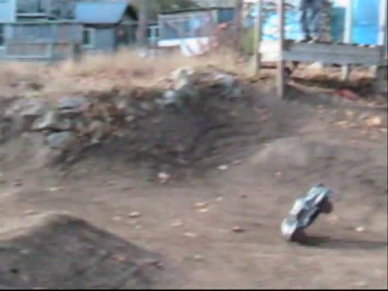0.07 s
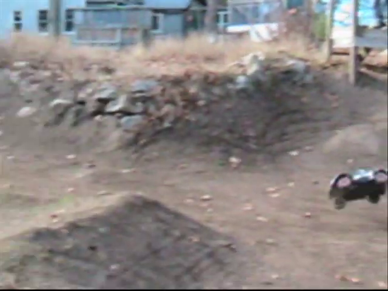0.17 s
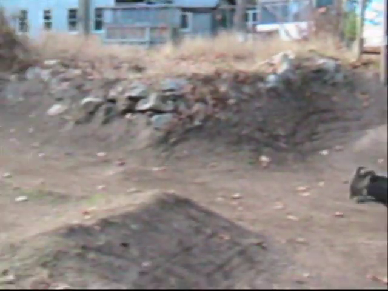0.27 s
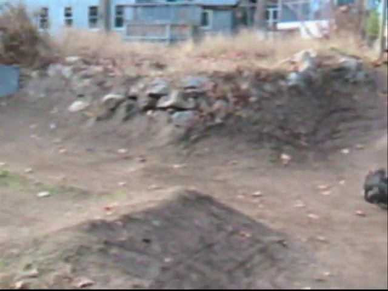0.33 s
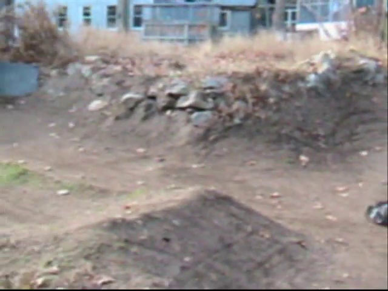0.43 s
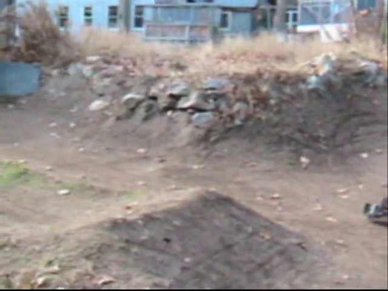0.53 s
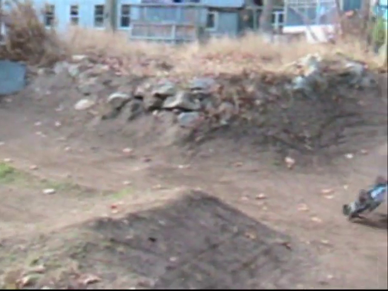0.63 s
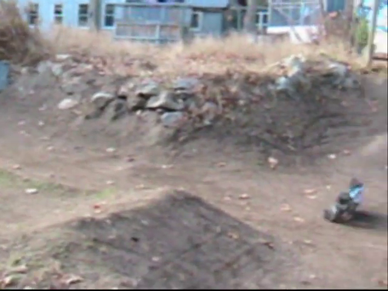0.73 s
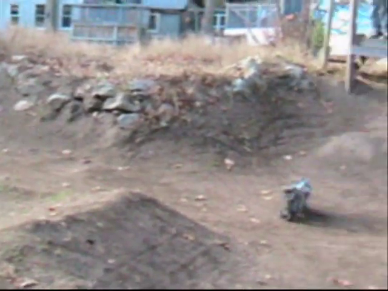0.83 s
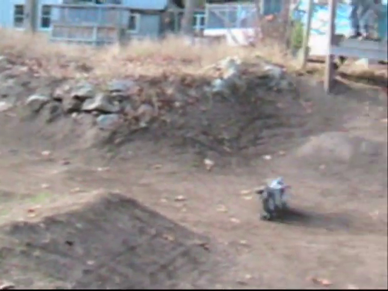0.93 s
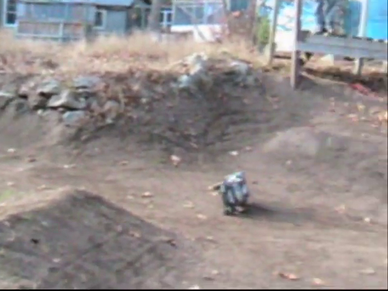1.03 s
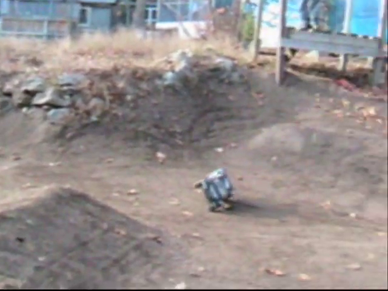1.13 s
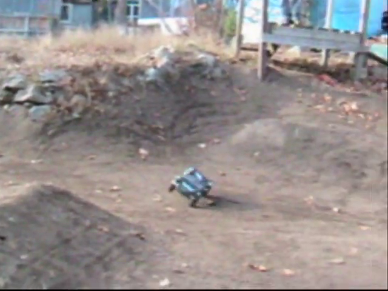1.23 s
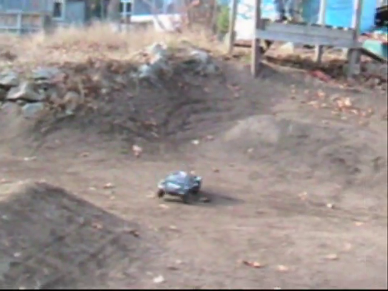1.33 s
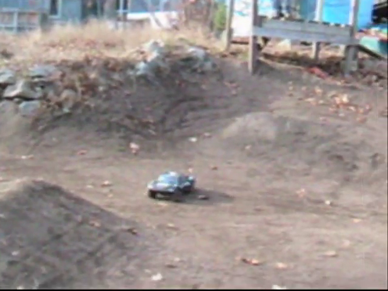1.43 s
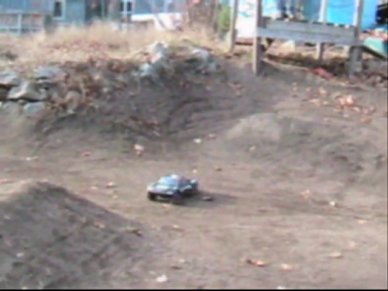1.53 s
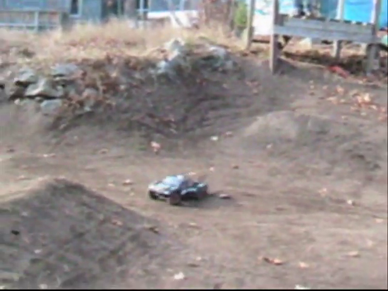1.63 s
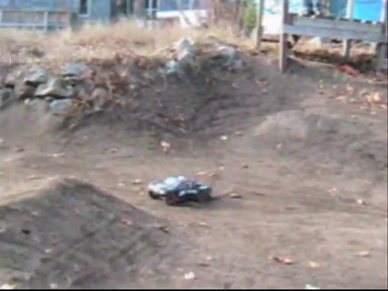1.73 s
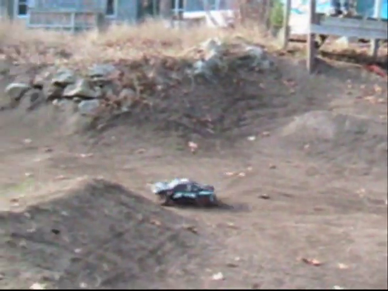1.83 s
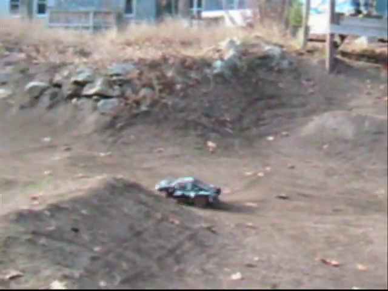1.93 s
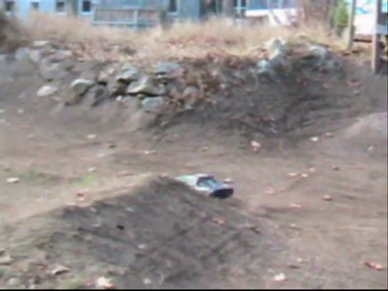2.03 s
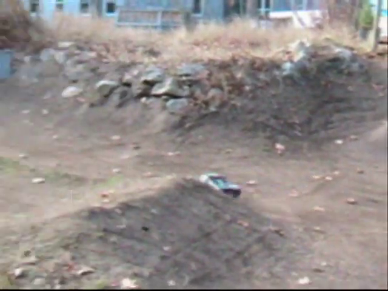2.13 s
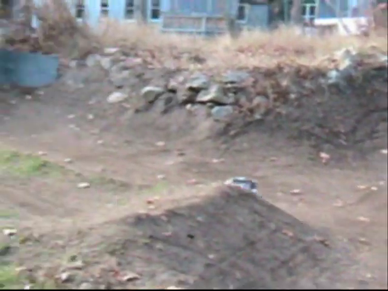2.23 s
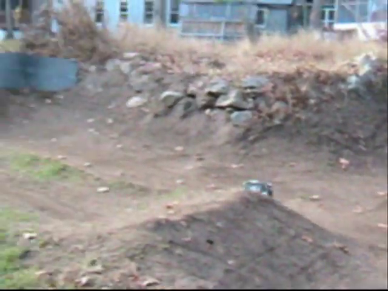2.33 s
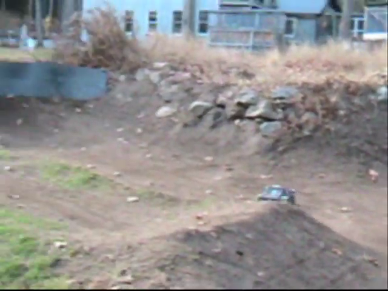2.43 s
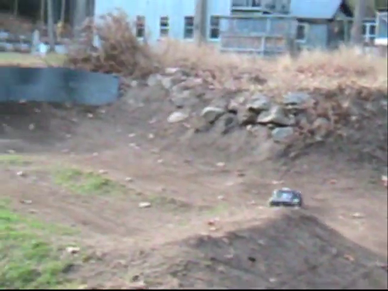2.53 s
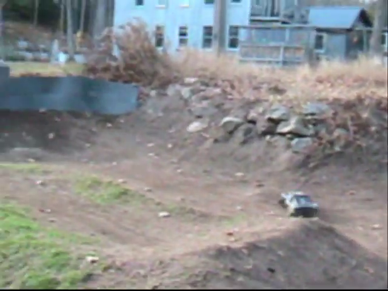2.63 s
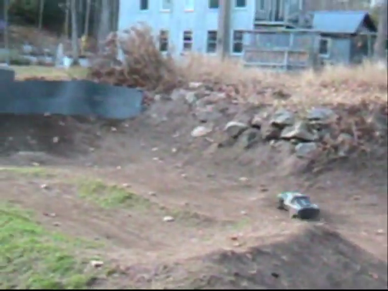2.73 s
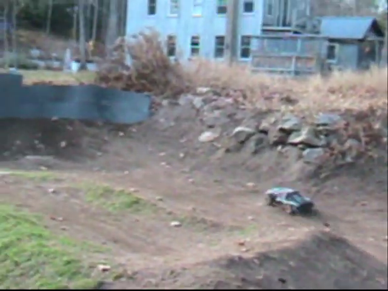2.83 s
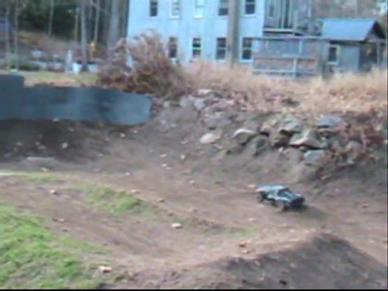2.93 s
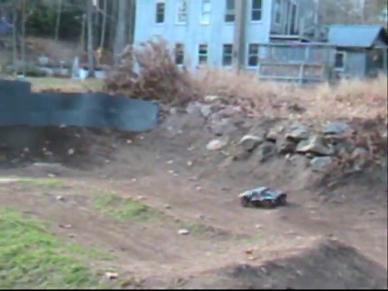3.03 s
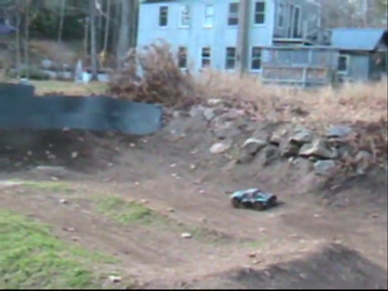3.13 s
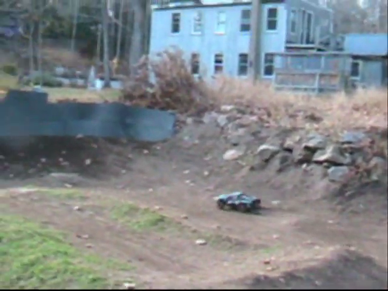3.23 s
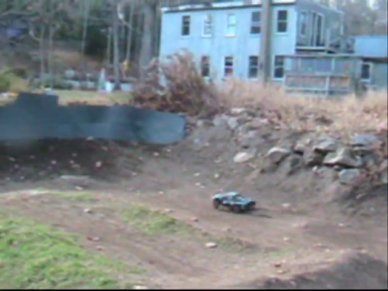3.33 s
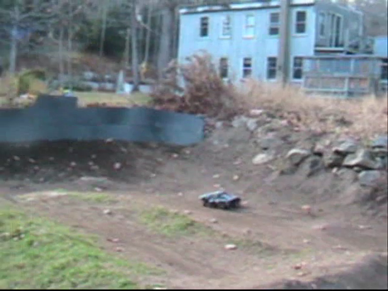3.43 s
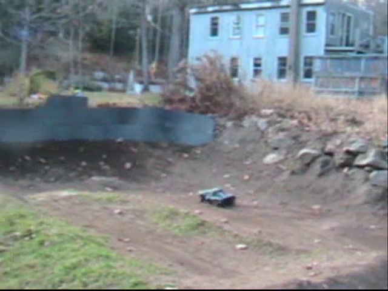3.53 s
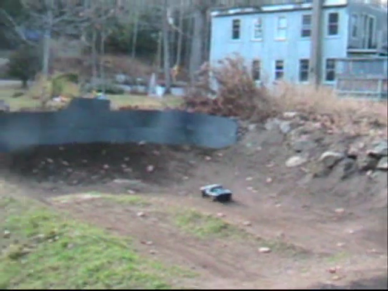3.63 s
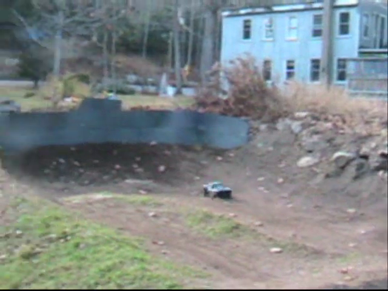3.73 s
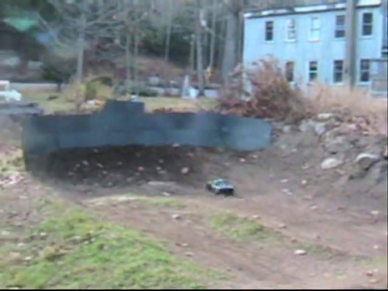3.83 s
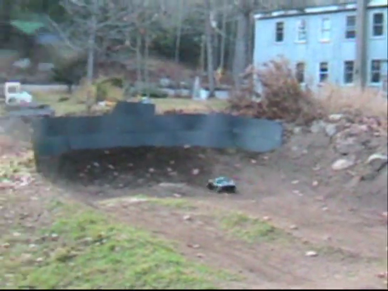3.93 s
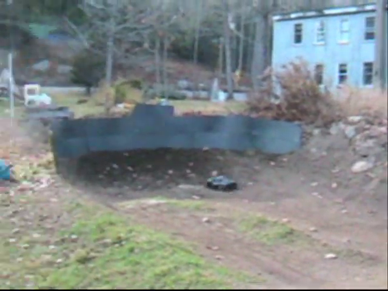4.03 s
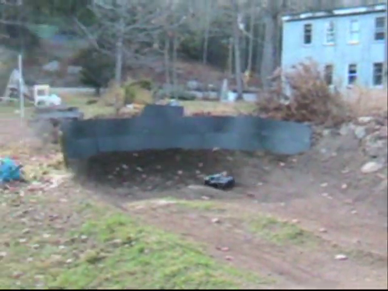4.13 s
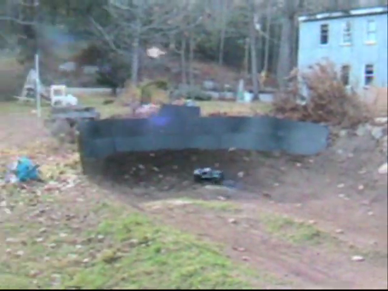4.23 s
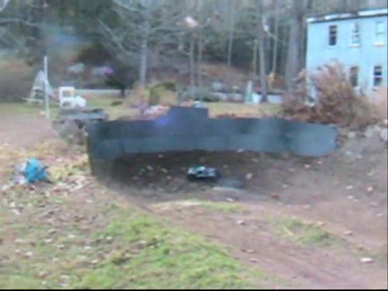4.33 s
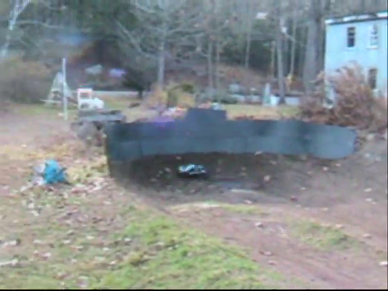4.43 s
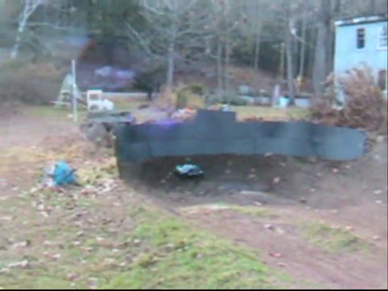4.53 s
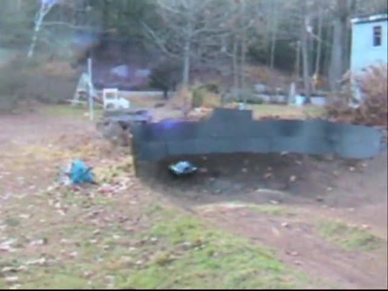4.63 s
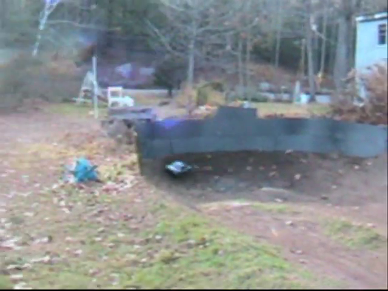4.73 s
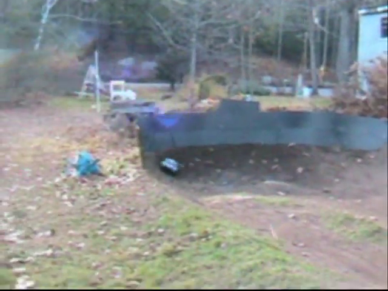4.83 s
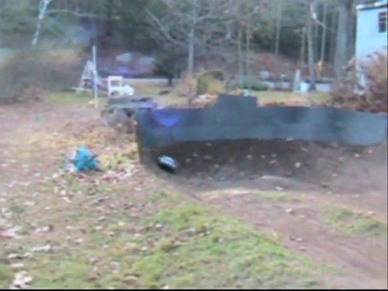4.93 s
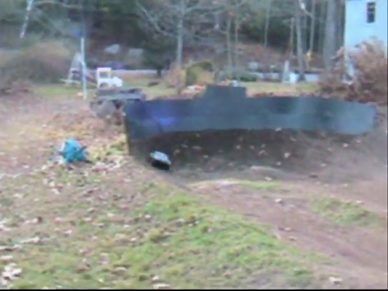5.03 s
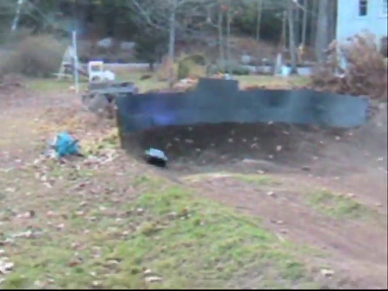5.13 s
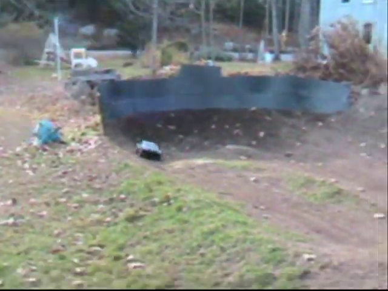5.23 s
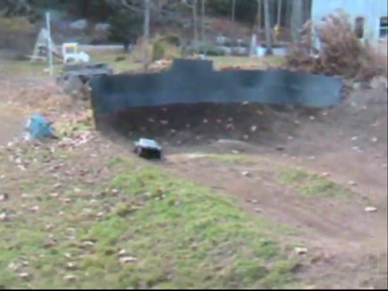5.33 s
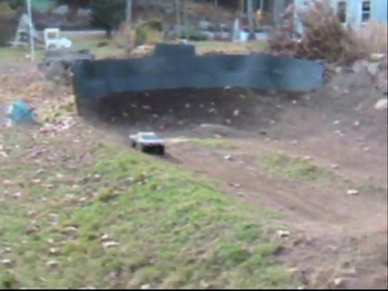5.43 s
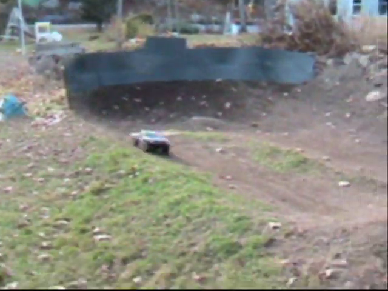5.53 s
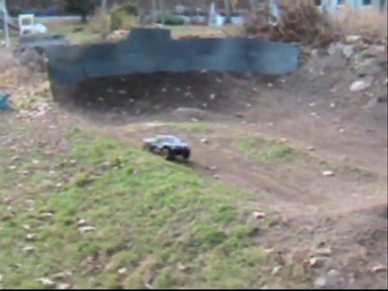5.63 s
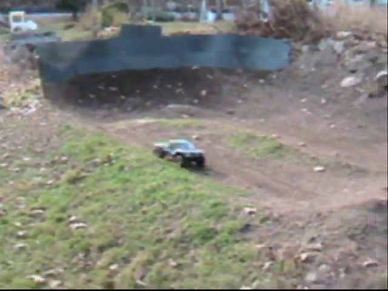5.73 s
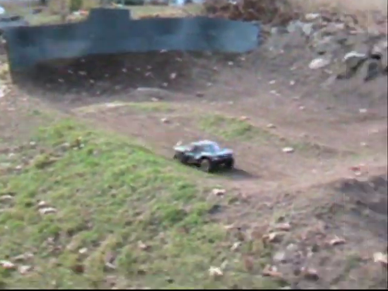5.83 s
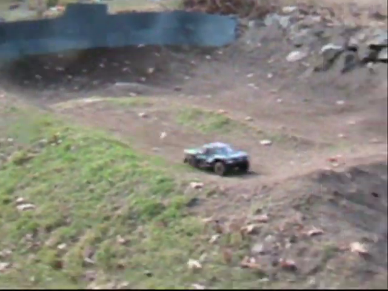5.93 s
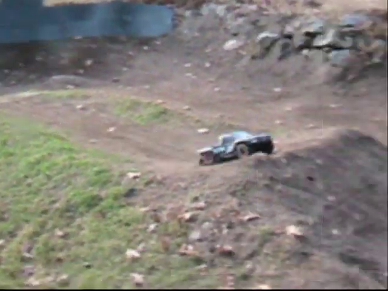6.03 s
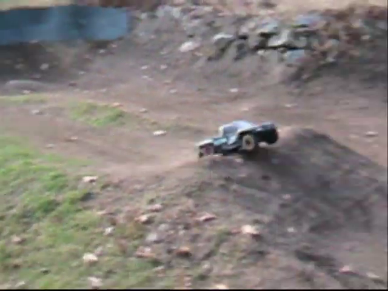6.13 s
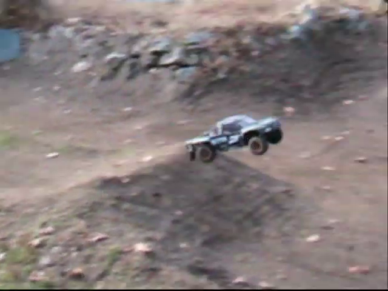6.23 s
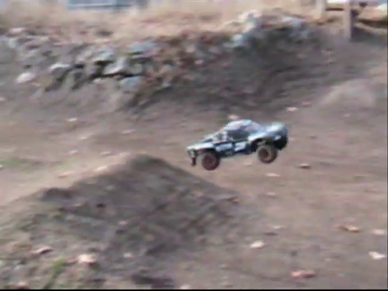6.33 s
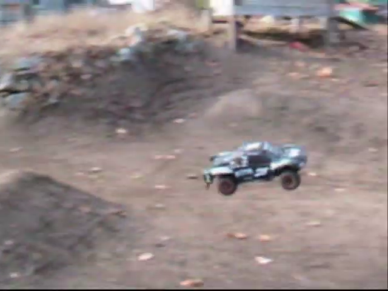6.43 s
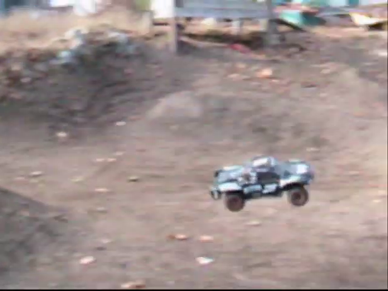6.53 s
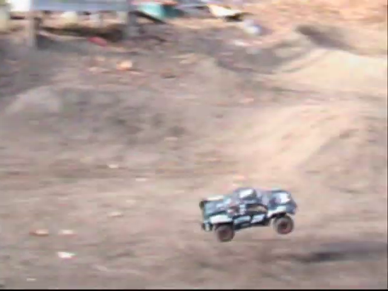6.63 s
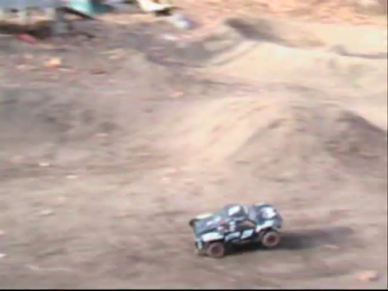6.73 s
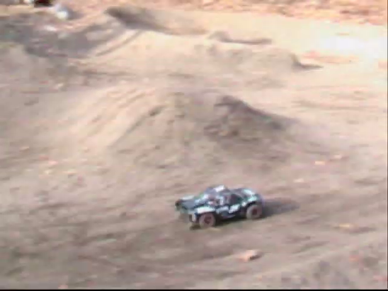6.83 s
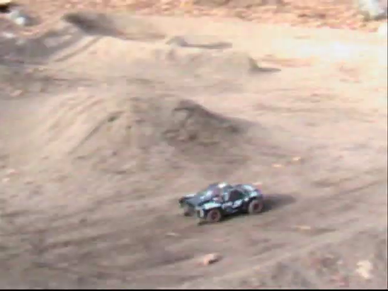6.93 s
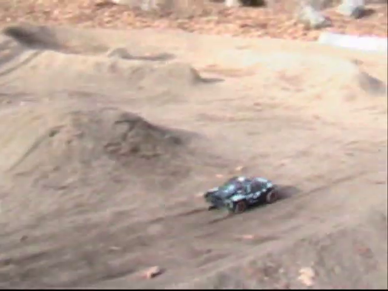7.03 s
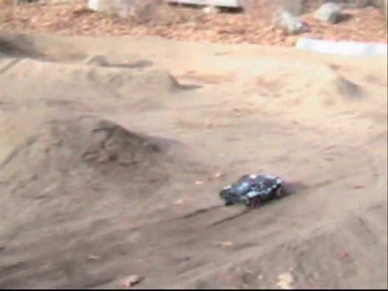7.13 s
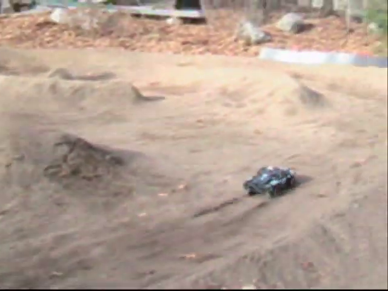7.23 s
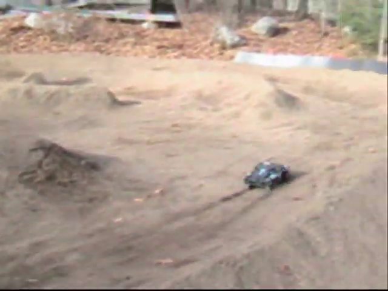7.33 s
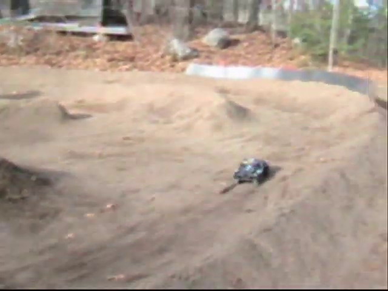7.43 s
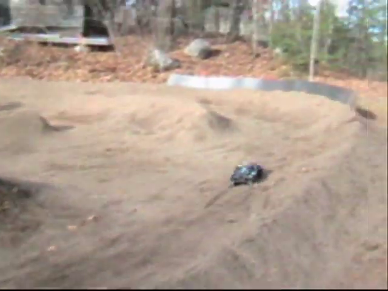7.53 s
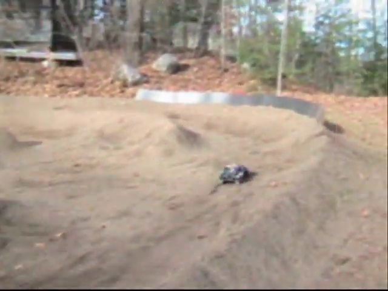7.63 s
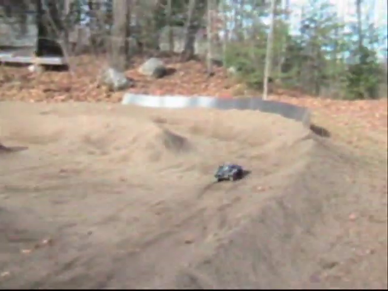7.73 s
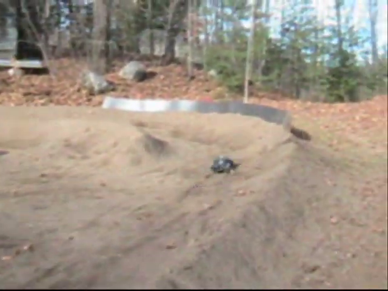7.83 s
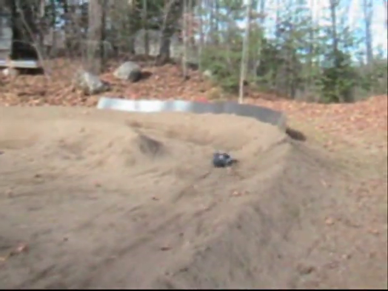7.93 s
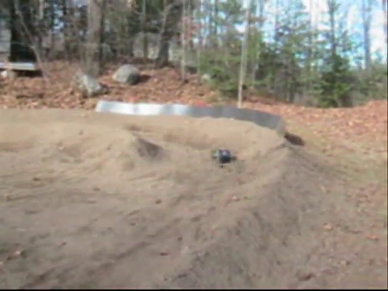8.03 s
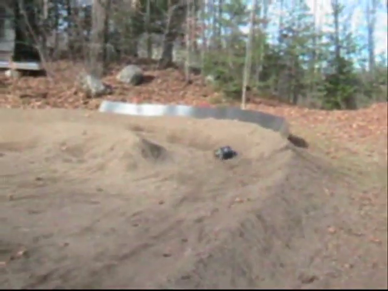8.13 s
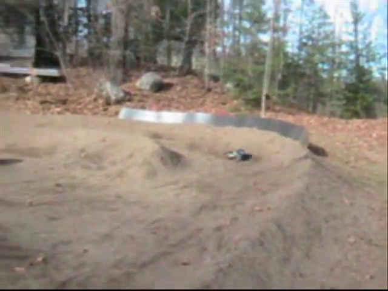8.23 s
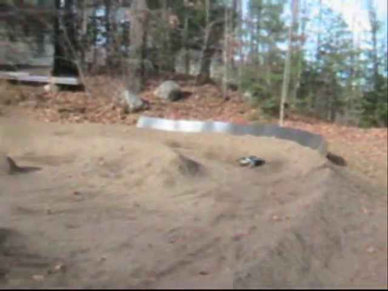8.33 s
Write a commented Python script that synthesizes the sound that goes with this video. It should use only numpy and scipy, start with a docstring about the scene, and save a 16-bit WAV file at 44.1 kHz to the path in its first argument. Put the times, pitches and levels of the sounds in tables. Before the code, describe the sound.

Outdoors, over faint steady air, a quick run of loud hollow plastic knocks marks a radio-controlled truck crashing on dirt. Its electric motor then spins up and whines in swoops and chirps, quieter than the crash, along with gritty tyre noise and chattering gears. Sharp clacks bunch together over bumps before a short, clattering landing near the microphone, after which the whine picks up again.

```python
"""A plastic shell claps, booms and rattles over faint outdoor air: a small electric radio-controlled truck
tumbles after a jump. It rights itself and laps a dirt track. The tyres drum, scrub and throw grit, the
motor whines in swoops as the wheels hop and grip, and the drivetrain chatters and clacks over the bumps.
A chirr pulses through the banked turn; the truck lands a second jump close by and drives on."""
import sys
import numpy as np
from scipy import signal
from scipy.fft import rfft, irfft, next_fast_len
from scipy.io import wavfile
from scipy.ndimage import map_coordinates

SR = 44100
rng = np.random.default_rng(int(sys.argv[2]) if len(sys.argv) > 2 else 0)


def dump(signal):
    """Clip the signal to [-1, 1] and save it as 16-bit WAV at the path in sys.argv[1]."""
    limited = np.clip(np.atleast_2d(signal).T, -1, 1)
    pcm = np.round(limited * 32767).astype(np.int16)
    wavfile.write(sys.argv[1], SR, pcm)


N = 369116
TIME = np.arange(N) / SR

# the bed of outdoor air: (frequency [Hz], relative level [dB])
AIR_EQ = [(20, -18), (45, -28), (75, -14), (130, -10.5), (210, -6), (300, -3), (400, -6.5), (570, -8.5),
          (920, -15), (2170, -22.5), (7700, -44), (15500, -37)]
# partials of a faint low hum: (frequency [Hz], relative level [dB])
HUM_PARTIALS = [(43, -62.5), (102, -58.5), (204, -52)]
# the shell hits the ground: (time [s], boom [dB], thump [dB], clap [dB])
SHELL_HITS = [(0.096, 7, -10.5, -11.5), (0.134, -10, -17.5, -19.5), (0.183, -11, -36, -27.5),
              (0.218, -13, -30, -36), (0.344, -22, -40, -38), (0.402, -1, -15, -18.5),
              (0.452, -6, -13, -21), (0.522, -4.5, -14, -14), (0.763, -22, -34.5, -33.5),
              (0.841, -12, -18, -22), (0.884, -14.5, -38, -31.5), (1.016, -16.5, -26, -30),
              (1.433, -32, -32, -34), (6.82, -10.5, -24, -18.5), (6.835, -6.5, -10, -11),
              (6.879, -2.5, -16, -19.5)]
# resonances of the shell: (frequency [Hz], level [dB], t60 [s])
SHELL_MODES = [(221, -7, 0.12), (270, -5, 0.1), (515, -1.5, 0.062), (570, -5, 0.045), (712, -6.5, 0.06),
               (908, -17.5, 0.055), (1800, -10.5, 0.015)]
# the body and the snap of a hit: (frequency [Hz], relative level [dB])
THUMP_EQ = [(20, -75), (40, -35), (100, -11.5), (200, 0), (270, -2.5), (370, -2), (520, 2.5), (700, 0.5),
            (1000, -11.5), (2000, -39)]
CLAP_EQ = [(300, -20), (800, 1), (1400, 2), (2500, -5), (4000, -11.5), (5500, -19), (6500, -27.5),
           (8500, -27), (12000, -20), (15500, -16)]
# a hard chassis part strikes the ground: (time [s], level [dB])
CHASSIS_HITS = [(0.843, -18)]
# resonances of that part: (frequency [Hz], level [dB], t60 [s])
CHASSIS_MODES = [(2870, 5, 0.019), (3300, -16, 0.022)]
# tyre faders through bends, banked turn and jump: (time [s], scrub [dB], rumble [dB], grit [dB])
TYRE_LEVELS = [(1.439, -41, -33.5, -45.5), (1.56, -37.5, -47, -39), (1.95, -33.5, -38.5, -42),
               (2.47, -39, -46.5, -46.5), (2.55, -53, -65, -58.5), (2.68, -49, -67, -59),
               (2.86, -40, -58.5, -44.5), (3.049, -37.5, -47, -44), (3.22, -42.5, -59, -48.5),
               (3.37, -38.5, -42.5, -42), (3.699, -44, -45, -50), (4.08, -41, -41, -48),
               (4.33, -30.5, -34.5, -43), (4.661, -35.5, -38.5, -42), (5.1, -46, -47, -50.5),
               (5.7, -39.5, -42, -44), (6.0, -33, -37.5, -38.5), (6.24, -33, -35.5, -37.5),
               (6.36, -43.5, -47, -45.5), (6.759, -43, -47, -46.5), (7.05, -33.5, -41.5, -39.5),
               (7.9, -40.5, -49.5, -47), (8.36, -39, -45, -47.5)]
# tone of the three tyre layers: (frequency [Hz], relative level [dB])
RUMBLE_EQ = [(40, -46.5), (100, -6), (180, -2), (270, 3), (390, -5), (550, 0), (800, -24.5), (1500, -47.5)]
SCRUB_EQ = [(350, -20), (620, 6.5), (850, 3), (1150, 2.5), (1600, 0), (2200, -22), (4000, -35)]
GRIT_EQ = [(900, -18), (1800, 2), (2500, -1.5), (3500, -4.5), (4800, -9), (6300, -18.5), (8000, -22.5),
           (10500, -15), (13800, -13), (14700, -11.5), (15500, -16)]
# pulls of the throttle:
# (on [s], off [s], start pitch [Hz], target pitch [Hz], whine [dB], drone [dB], chatter [dB])
THROTTLE_PULLS = [(1.448, 2.12, 1310, 4150, -48, -47, -43), (2.171, 2.42, 4700, 4350, -58.5, -43, -43),
                  (2.75, 3.1, 2095, 3990, -50.5, -44.5, -41), (3.25, 3.52, 2680, 4150, -49, -42.5, -39.5),
                  (3.62, 4.027, 3090, 4560, -53, -58, -40.5), (4.15, 4.906, 4460, 4145, -55, -58, -40.5),
                  (4.96, 5.12, 3720, 3300, -56, -69, -42), (5.17, 5.85, 4100, 4705, -55.5, -49.5, -41.5),
                  (5.95, 6.28, 4720, 4795, -61, -46, -39.5), (6.97, 7.298, 3400, 4500, -45.5, -40, -41),
                  (7.353, 8.03, 4425, 4480, -51, -43, -37.5), (8.12, 8.37, 4100, 4550, -53.5, -58, -49)]
# motor chirps: a rising zip as the truck launches, then chirps on the hardest tyre bites: (time [s], first
# pitch [Hz], last pitch [Hz], level [dB])
BITE_CHIRPS = [(1.468, 1106, 1655, -27), (1.524, 2500, 2955, -39), (1.644, 3760, 3515, -37.5),
               (1.802, 4170, 3500, -40.5), (1.872, 4150, 3888, -39), (2.845, 3070, 2940, -42),
               (2.91, 3630, 3084, -40), (3.035, 4000, 3460, -45), (3.274, 3000, 2810, -41),
               (3.406, 3920, 3286, -41), (3.645, 3280, 2975, -36.5), (3.945, 4140, 3800, -43.5),
               (4.474, 4050, 3870, -45), (4.801, 4880, 4200, -54), (5.185, 4800, 3800, -51.5),
               (5.44, 4900, 4100, -50), (6.189, 4850, 4450, -43), (7.02, 4200, 3590, -41),
               (7.645, 4710, 4400, -43)]
# resonances of the drivetrain: (frequency [Hz], level [dB], t60 [s])
GEARBOX_MODES = [(1271, 1, 0.018), (1381, -3, 0.066), (1476, -3.5, 0.022)]
# suspension and drivetrain clack over bumps: (time [s], ring [dB], tick [dB])
BUMP_CLACKS = [(3.2385, -30, -59), (4.0838, -29.5, -53), (4.1938, -45, -31.5), (4.3121, -29, -33),
               (4.3405, -27, -36), (4.7738, -24.5, -52), (6.1281, -18.5, -23.5), (6.1908, -21.5, -32),
               (6.2426, -26, -26), (6.335, -21.5, -36), (6.3916, -24.5, -37), (6.4867, -24, -39),
               (6.552, -28, -56), (6.7062, -30, -38), (7.4367, -17, -40)]

REBOUND_S, REBOUND_LOSS_DB = .026, (7, 5, 7.5)   # typical gap; loss per bounce in boom, thump, clap
SPIN_UP_S, STRAIN_DB_PER_OCTAVE, CHATTER_DB_PER_OCTAVE, COAST_DB = .17, 10, 8, -2.5
MIRROR_HZ, LOWER_MIRROR_HZ = 16000, 12000   # carriers that flip the gear sound into the treble


def from_db(db):
    """Decibels to gain."""
    return 10 ** (np.asarray(db) / 20)


def rms_one(x):
    """Scale to unit power."""
    return x / np.sqrt(np.mean(x ** 2) + 1e-20)


def automation(rows):
    """Breakpoints (time, values...) drawn out into one curve per value."""
    times, *columns = np.transpose(rows)
    return [np.interp(TIME, times, column) for column in columns]


def during(start, end, fade):
    """A gate, fully open from start to end, with soft edges."""
    return np.interp(TIME, [start - fade, start, end, end + fade], [0, 1, 1, 0])


def drift(per_s):
    """Smooth random modulation at unit power, through per_s points a second."""
    knots = rng.standard_normal(4000)
    return rms_one(map_coordinates(knots, [TIME * per_s], order=2, mode="wrap"))


def colour(x, eq):
    """Minimum-phase EQ, so attacks stay clean; white noise keeps its power."""
    size = 2 * next_fast_len(N // 2 + SR // 2)
    hz, db = np.transpose(eq)
    bin_hz = np.arange(size // 2 + 1) * SR / size
    gain = rms_one(from_db(np.interp(np.log(bin_hz + 1), np.log(hz), db)))
    cepstrum = irfft(np.log(gain))
    cepstrum[1:size // 2] *= 2
    cepstrum[size // 2 + 1:] = 0
    return irfft(rfft(x, size) * np.exp(rfft(cepstrum)))[:N]


def ring(force, modes):
    """A resonator bank: a unit click rings each mode at its own level, in alternating polarity."""
    out = np.zeros(N)
    for k, (hz, db, t60) in enumerate(modes):
        radius, angle = from_db(-60 / (t60 * SR)), 2 * np.pi * hz / SR
        feedback = [1, -2 * radius * np.cos(angle), radius * radius]
        out += (-1) ** k * from_db(db) * signal.lfilter([0, np.sin(angle)], feedback, force + 1e-18)
    return out


def clicks(times, db):
    """One click for each event."""
    out = np.zeros(N)
    out[np.round(times * SR).astype(int)] = from_db(db)
    return out


def dying(blows, t60):
    """Envelope that jumps at each blow and dies away; overlapping blows add in power."""
    power_kept = from_db(-120 / (t60 * SR))
    return np.sqrt(signal.lfilter([1], [1, -power_kept], blows ** 2 + 1e-18))


def grains(per_s, spread_db):
    """Tiny contacts of uneven size at random moments, at unit power."""
    sizes = from_db(spread_db * np.minimum(rng.exponential(1, N), 4))
    return rms_one(sizes * rng.choice([-1, 1], N) * (rng.random(N) < per_s / SR))


def background():
    """Steady outdoor air, with a faint wavering hum that fades in towards the end."""
    air = from_db(-43) * colour(rng.standard_normal(N), AIR_EQ)
    hum = sum(from_db(db + 4) * np.sin(2 * np.pi * hz * TIME + .5 * drift(7.1))
              for hz, db in HUM_PARTIALS)
    return air + hum * np.interp(TIME, [5.8, 8.1], [0, 1])


def rebounds(contacts):
    """The shell bounces unevenly after each hit, weaker every time; rows as in SHELL_HITS."""
    blows = []
    for time, *levels_db in SHELL_HITS:
        for k in range(contacts):
            blows.append((time, *(np.array(levels_db) - k * np.array(REBOUND_LOSS_DB))))
            time += REBOUND_S * rng.uniform(.7, 1.3)
    return blows


def crashes():
    """Each blow booms in the thin shell, which claps against the chassis and rattles on."""
    times, boom_db, thump_db, clap_db = np.transpose(rebounds(contacts=4))
    boom = ring(clicks(times, boom_db - 9), SHELL_MODES)
    # so small a shell gives off no deep bass
    boom = signal.sosfilt(signal.butter(2, 60, "high", fs=SR, output="sos"), boom)
    thump_envelope = dying(clicks(times, thump_db - .5), t60=.15)
    thump = colour(thump_envelope * grains(3000, spread_db=1.5), THUMP_EQ)
    slaps = clicks(times, clap_db + 1.5)
    clap = dying(slaps, t60=.0073)
    rattle = from_db(-.5 + 3.6 * drift(250)) * dying(slaps, t60=.11)
    falling_dirt = from_db(-29 + .96 * drift(140)) * dying(slaps, t60=1)
    # softened attack: the flexible panels take a moment to come fully into contact
    envelope = signal.sosfilt(signal.butter(1, 96.5, fs=SR, output="sos"), clap + rattle + falling_dirt)
    return boom + thump + colour(envelope * grains(7000, spread_db=4), CLAP_EQ)


def yard_echo(x, t60, dull_hz):
    """Banks, fence and trees scatter back a thin, dull tail."""
    echoes = grains(1500, spread_db=-1) * from_db(-60 * TIME / t60) * (TIME > .012)
    echoes = signal.sosfilt(signal.butter(1, dull_hz, fs=SR, output="sos"), echoes[:SR])
    return signal.fftconvolve(x, echoes / np.sqrt(np.sum(echoes ** 2)))[:N]


def chassis_knock():
    """A stiff part of the chassis strikes the ground with a short, bright clack."""
    return ring(clicks(*np.transpose(CHASSIS_HITS)), CHASSIS_MODES)


def tyres():
    """Knobs drum on the ground, scrub the soil and fling grit at the shell, surging with the bumps."""
    rolling = during(TYRE_LEVELS[0][0], TYRE_LEVELS[-1][0], fade=.038)
    scrub, rumble, grit = from_db(automation(TYRE_LEVELS)) * rolling
    bumps = np.tanh(drift(55))   # the suspension cushions the largest jolts
    drumming = colour(rumble * from_db(-1 + bumps) * grains(2500, spread_db=4), RUMBLE_EQ)
    scrubbing = colour(scrub * from_db(-.5 + 2.9 * bumps) * grains(3000, spread_db=1), SCRUB_EQ)
    spray = colour(grit * from_db(-.76 + 4.24 * bumps) * grains(6000, spread_db=3), GRIT_EQ)
    return drumming + scrubbing + spray


def throttle():
    """Each pull glides the motor towards a target speed; between pulls it coasts, the gears quieter."""
    course, pulling, whine_gain, drone_gain = [], 0, 0, 0
    for on, off, start_hz, target_hz, whine_db, drone_db, chatter_db in THROTTLE_PULLS:
        for time in np.linspace(on, off):
            hz = target_hz + (start_hz - target_hz) * np.exp((on - time) / SPIN_UP_S)
            course.append((time, hz, target_hz, chatter_db))
        held = during(on, off, fade=.014)
        pulling = np.maximum(pulling, held)
        whine_gain += held * from_db(whine_db)
        drone_gain += held * from_db(drone_db)
    speed_hz, target_hz, chatter_db = automation(sorted(course))
    # below its target the motor strains: more whine, less drone
    strain = from_db(STRAIN_DB_PER_OCTAVE * np.log2(target_hz / speed_hz))
    chatter_db += CHATTER_DB_PER_OCTAVE * np.log2(speed_hz / speed_hz.max()) + COAST_DB * (1 - pulling)
    chatter_gain = from_db(chatter_db) * (TIME > THROTTLE_PULLS[0][0])
    return speed_hz, whine_gain * strain, drone_gain / strain, chatter_gain


def wheel_hop(per_s, unevenness):
    """Phase of the uneven hop cycle: the wheels bite at 0 and spin free towards 1."""
    lengths = np.exp(unevenness * rng.standard_normal(N // 100)) / per_s
    bites = np.cumsum(lengths) - lengths[0]
    return np.interp(TIME, bites, np.arange(len(bites))) % 1


def motor(speed_hz, gain, hop, swing, wander, chirp_s):
    """The motor sags and sings on each bite of the hopping wheels, zipping up at launch and chirping on the
    hardest bites."""
    swoop = np.interp(hop, [0, .75, 1], [1, -1, 1])
    pitch_hz = speed_hz * (1 + swing * swoop + wander * np.tanh(drift(15)))
    bite = np.interp(hop, [0, .15, .6, .8, 1], [.5, 1.1, 1.1, .3, .5])
    gain = gain * bite * from_db(4.4 * np.tanh(drift(14)))
    for start, first_hz, last_hz, db in BITE_CHIRPS:
        along = (TIME - start) / chirp_s
        swell = from_db(db) * np.interp(along, [-.1, .2, .7, 1.1], [0, 1, 1, 0])
        leads = swell > gain   # the chirp takes over wherever it is louder
        pitch_hz[leads] = first_hz + (last_hz - first_hz) * along[leads]
        gain[leads] = swell[leads]
    shudder = from_db(2 * drift(110))   # the load on the gears shudders with the ground
    return gain * shudder * whine(pitch_hz, waver=.011, rasp=.5)


def whine(pitch_hz, waver, rasp):
    """Gear whine, with thin high whistles that fall as it rises."""
    phase = 2 * np.pi * np.cumsum(pitch_hz * (1 + waver * drift(600))) / SR
    at_speed = np.clip(pitch_hz / 4000, 0, 1) ** 2
    tone = np.sin(phase) + from_db(-23.5) * np.sin(2 * phase)
    # at speed, tooth-to-tooth play puts a raspy edge on the tone
    edge = rasp * at_speed * drift(1200) * np.cos(phase)
    upper, lower = 2 * np.pi * MIRROR_HZ * TIME, 2 * np.pi * LOWER_MIRROR_HZ * TIME
    whistles = from_db(-9.5) * np.sin(upper - phase) + from_db(-18.5) * np.sin(lower - phase)
    flicker = from_db(2 * drift(150))
    return flicker * (tone + edge + at_speed * whistles * (1 + .63 * drift(800)))


def gear_drone(speed_hz, gain, gear_ratio, waver):
    """A slower gear drones below the motor, steadied by the mass of the wheels."""
    pitch_hz = speed_hz / gear_ratio * (1 + waver * drift(120))
    flutter = from_db(2.5 + 2.8 * drift(110))
    return gain * flutter * np.sin(2 * np.pi * np.cumsum(pitch_hz) / SR)


def gear_chatter(gain, hop):
    """Teeth chatter in the gearbox, hardest when the wheels bite, with a thin sizzle on top."""
    teeth = grains(3000, spread_db=4.5) * from_db(-9 * hop)
    chatter = gain * rms_one(ring(teeth, GEARBOX_MODES))
    sizzle = from_db(-20) * chatter * 2 * np.cos(2 * np.pi * MIRROR_HZ * TIME)
    return chatter + sizzle


def clacks():
    """Slack parts knock together: a short tick, and the gearbox rings and buzzes briefly."""
    times, ring_db, tick_db = np.transpose(BUMP_CLACKS)
    crunch = grains(6000, spread_db=2)
    tick = colour(dying(clicks(times, tick_db + 5.5), t60=.032) * crunch, CLAP_EQ)
    buzz = dying(clicks(times, ring_db - 25.5), t60=.043) * crunch
    return tick + ring(clicks(times, ring_db + .5) + buzz, GEARBOX_MODES)


def chirr(start_s, end_s, hz, per_s):
    """A narrow, rough tone pulses while the truck leans through the turn."""
    pulses = (.5 + .5 * np.sin(2 * np.pi * per_s * TIME + drift(10))) ** 2
    tone = rms_one(ring(pulses * rng.standard_normal(N), [(hz, 0, .02)]))
    return from_db(-54) * during(start_s, end_s, fade=.04) * tone


def scene():
    """The mono mix: the truck and its echoes over the outdoor bed."""
    hop = wheel_hop(per_s=21, unevenness=.35)
    speed_hz, whine_gain, drone_gain, chatter_gain = throttle()
    truck = motor(speed_hz, whine_gain, hop, swing=.0616, wander=.025, chirp_s=.046)
    truck += gear_drone(speed_hz, drone_gain, gear_ratio=4, waver=.01009)
    truck += gear_chatter(chatter_gain, hop)
    truck += chirr(start_s=4.47, end_s=5.13, hz=2650, per_s=21)
    truck += tyres() + clacks() + chassis_knock() + crashes()
    echo = from_db(-20.5) * yard_echo(truck, t60=.49, dull_hz=2940)
    return (truck + echo + background())[None]


def record(dry):
    """Soft saturation rounds the loudest peaks; a steep low-pass cuts the top."""
    rounded = 1.305 * np.tanh(dry / 1.282)
    return signal.sosfilt(signal.ellip(12, .1, 70, 15700, fs=SR, output="sos"), rounded)


dry = scene()
out = record(dry)
dump(out)
```